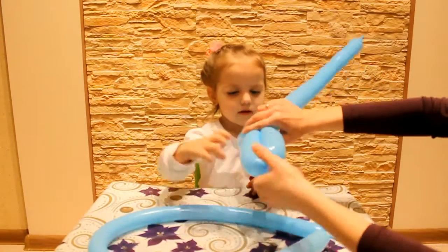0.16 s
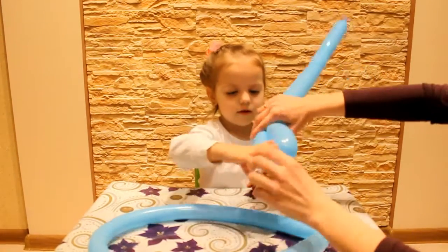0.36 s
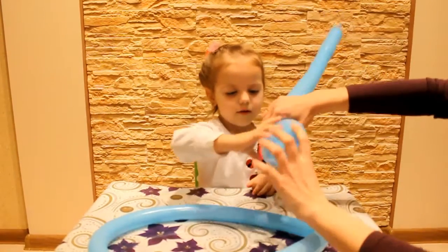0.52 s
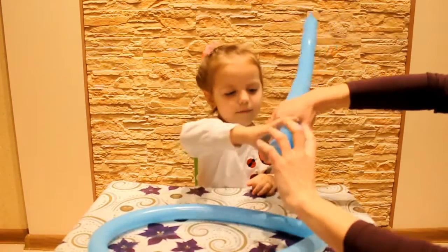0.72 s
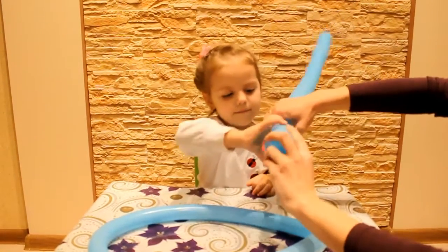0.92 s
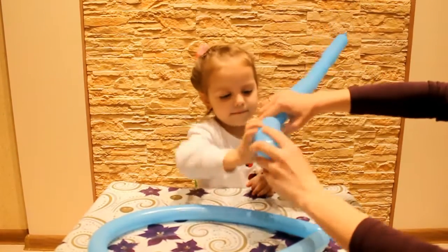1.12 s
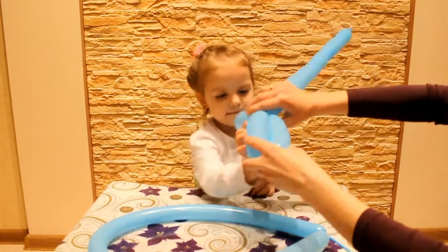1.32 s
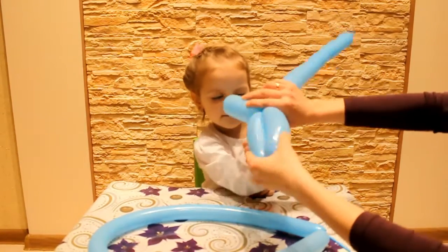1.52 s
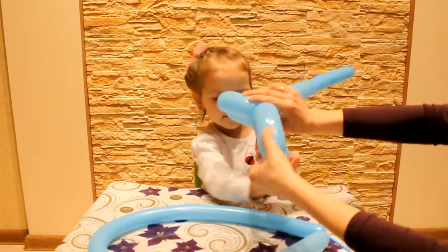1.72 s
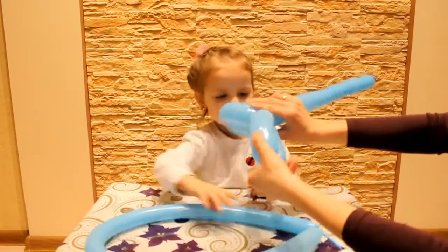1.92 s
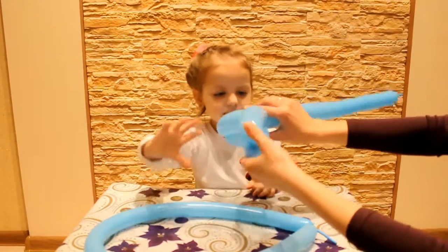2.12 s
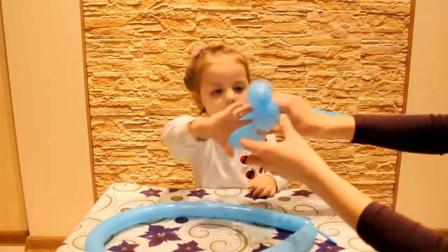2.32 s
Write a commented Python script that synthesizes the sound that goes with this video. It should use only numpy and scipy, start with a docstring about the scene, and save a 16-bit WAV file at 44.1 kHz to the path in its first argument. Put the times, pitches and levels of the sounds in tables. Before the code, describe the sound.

A latex balloon is twisted by hand, starting with sharp rubbery snaps, fine rubbing and soft bumps. A faint squeak rises at 0.4 seconds. After a lull around 1 second, snaps crowd into a loud, fast chattering creak at 1.45 seconds. More snaps follow and thin out, with two strong ones near 2 seconds. Each leaves a short echo in the bare room, heard from a distance.

```python
"""A bare, echoing room; one microphone, far enough off to hear as much room as balloon.
Hands twist a long latex balloon: the rubber sticks and slips in single snaps, with fine rubbing between
them and a few soft bumps. A faint squeak rises at 0.37 s. After a lull around 1 s the snaps crowd together,
and at 1.45 s they run into one fast chattering creak. More snaps follow and thin out.
Each slip is a few milliseconds long; the room draws it out into a tail."""
import sys
import numpy as np
from scipy import signal
from scipy.fft import rfft, irfft
from scipy.io import wavfile
from scipy.ndimage import uniform_filter1d

SR = 44100
rng = np.random.default_rng(int(sys.argv[2]) if len(sys.argv) > 2 else 0)


def master_out(mix):
    """Clip the mix to full scale and print it as 16-bit PCM to the path in sys.argv[1]."""
    frames = np.transpose(np.atleast_2d(mix))
    ceiling = np.clip(frames, -1, 1)
    pcm = np.round(ceiling * 32767).astype(np.int16)
    wavfile.write(sys.argv[1], SR, pcm)


N = 103811

# Room tone. Each row: frequency in Hz, relative level in dB.
ROOM_TONE_COLOUR = [(25, -51), (100, 1), (300, 11.5), (600, 4), (1500, 10.5), (4000, 2.5), (8000, -7),
                    (16000, -33)]
# Echoes off table and walls. Each row: delay in seconds, level in dB.
EARLY_ECHOES = [(.0035, -11.5), (.0092, -6.5), (0.0148, -16)]
# The room's tail. Each row: frequency in Hz, seconds to fall by 60 dB.
ROOM_DECAY = [(150, 0.7), (500, 0.52), (1400, 0.53), (3700, 0.42), (8000, 0.33), (14000, 0.27)]
# Hands bumping the balloon. Each row: start in seconds, level in dB, pitch in Hz.
HAND_BUMPS = [(0.137, -37, 186), (0.518, -44, 131), (0.6, -37, 148), (1.96, -36, 226), (2.087, -36, 217),
              (2.16, -36, 215)]
# How skin and microphone colour a slip. Each row: frequency in Hz, gain in dB.
SKIN_COLOUR = [(35, -67), (60, -76), (103, -54.5), (212, -23.5), (515, 4.5), (924, -7), (1550, -6),
               (1820, -5.5), (3270, -9.5), (4030, -12.5), (10800, -26.5), (14200, -48.5), (16000, -104)]
# The balloon's resonances. Each row: centre in Hz, width in Hz, gain in dB.
RESONANCES = [(552, 78, -10), (580, 300, -0.5), (1005, 254, 3.5), (1538, 46, 3), (2280, 540, 1),
              (3055, 110, -2.5), (4870, 740, 0.5)]
# Course of the rubbing. Each row: time in seconds, relative level in dB, tilt in dB per octave.
RUB_COURSE = [(0, -18.5, -3.5), (.04, -55, 16.5), (0.124, -25, -2), (.2, -26, -1), (.3, -63, -2),
              (.38, -37, 0), (.5, -33, 0), (0.589, -37, -3), (.62, -31, 0.5), (0.701, -27, 1.5),
              (.73, -26, 0), (.77, -27.5, 3), (.8, -29, 4.5), (.87, -34, 1), (.95, -33, 1.1),
              (.97, -48, -1), (1.1, -40, -0.5), (1.3, -45.5, -0.5), (1.4, -35.5, 6), (1.46, -12, -2),
              (1.52, -13, 0), (1.6, -18, 3.5), (1.72, -23.5, 1.7), (1.8, -25.5, 1), (1.88, -33.5, 1.5),
              (1.95, -29, 2), (2.05, -31.5, 1.7), (2.12, -23.5, -0.8), (2.17, -27, 0.5), (2.35, -42, -2)]
# Bright band of the taut skin in the creak. Each row: frequency in Hz, gain in dB.
TAUT_BAND = [(3800, 2.6), (5200, 7.5), (7700, 4.5), (9000, 3)]
# Single slips. Each row: start in seconds, level in dB, flutter in Hz, tilt in dB per octave,
# decay scale in ms (0.8 at least is used), ring of the stretched patch in Hz, its gain in dB.
SNAPS = [(0.0514, -6, 930, 2, 1.16, 4250, 3.5), (0.1288, -17, 2110, -2.5, 1.7, 2080, -9),
         (0.1341, -12.5, 920, 4, 1.87, 1026, 9.5), (0.3265, -34.5, 2650, -3, 3.7, 2650, -10),
         (0.3417, -26, 650, 1.9, 2.3, 3400, 3), (0.4318, -21, 967, 2.5, 1.65, 2750, 2.5),
         (0.4955, -28, 2010, -3.5, 1.3, 420, 10), (.5525, -24, 1285, 13.5, 1.4, 2640, 11),
         (0.5942, -25, 700, 0, 2, 700, -5), (0.604, -19.5, 635, -1.5, 1.6, 420, 6),
         (0.647, -28.5, 582, 5.5, 1.6, 528, 23), (.6732, -27.5, 474, -0.5, 2.6, 524, 2),
         (.7176, -26, 573, 2, 11, 2220, -9), (0.7316, -15, 1210, 2.6, 0.51, 1290, 3.5),
         (0.987, -33.5, 673, 7, 1.9, 5000, -2), (1.1254, -30.5, 2900, 4.5, 1.7, 4500, -14),
         (1.1348, -12, 1730, -2, 1.08, 573, 7), (1.3364, -21.5, 3130, 0.5, 0.47, 2980, 2),
         (1.353, -26.5, 2540, 1.5, 2.5, 2720, -8), (1.393, -25, 837, -6.5, 3.2, 1610, 13),
         (1.4071, -15.5, 676, -4, 1.04, 2400, 13), (1.4123, -18, 1614, 5.5, 1.2, 3200, 9),
         (1.44, -3.5, 794, 2, 1.8, 2270, 6.5), (1.446, -41, 1550, 15, 3.1, 1530, 19),
         (1.5715, -17.5, 583, -1, 1.1, 542, 8), (1.5935, -7, 1780, 3.5, 1.4, 2630, 7),
         (1.608, -8.5, 1573, 4, 1.9, 6500, 7.5), (1.6285, -11, 1576, -2, 2.1, 1820, -3),
         (1.678, -12.5, 669, 4.5, 1.9, 1900, 9), (1.694, -9.5, 1355, 4.5, 0.75, 1280, 11),
         (1.706, -17, 1630, 5.5, 1.2, 2150, -2), (1.734, -21.5, 1380, 2, 1.8, 2820, 6),
         (1.9605, -5, 734, -0.5, 0.64, 2340, 3.5), (2.04, -25.5, 1426, 2.5, 2.4, 2280, -5),
         (2.081, -22.5, 500, 2.5, 2.9, 493, 2.5), (2.1543, -4, 1256, -2, 1.82, 4100, 5),
         (2.339, -21.5, 558, 0, 4.2, 630, 3.5)]

HZ = np.fft.rfftfreq(4096, 1 / SR)  # the grid for filter curves
OCTAVES = np.log2(np.maximum(HZ, 200) / 1500)  # tilts pivot on 1500 Hz


def amp(db):
    return 10 ** (np.asarray(db) / 20)


def unit_rms(x):
    return x / np.sqrt(np.mean(x ** 2) + 1e-20)


def curve_at(points, hz):
    f, value = np.transpose(points)
    return np.interp(np.log(hz + 1), np.log(f + 1), value)


def add(mix, start_s, sound):
    part = mix[round(start_s * SR):][:len(sound)]
    part += sound[:len(part)]


def coloured(x, db):
    """x through the shortest-delay filter for a dB curve on the HZ grid, tail included."""
    log_gain = np.log(amp(np.maximum(np.r_[db, db[-2:0:-1]], -100)))
    response = np.fft.ifft(np.exp(np.conj(signal.hilbert(log_gain)))).real[:2048]
    return signal.fftconvolve(x, response)


def room_tone(level_db=-48):
    """The steady noise of the room at the microphone."""
    colour = amp(curve_at(ROOM_TONE_COLOUR, np.fft.rfftfreq(N, 1 / SR)))
    return amp(level_db) * unit_rms(irfft(rfft(rng.standard_normal(N)) * colour, N))


def room_echo(direct, tail_db=1.5):
    """The room answers duller: early echoes, then three crossfading tails dying band by band."""
    duller = coloured(direct, -1.5 * np.maximum(OCTAVES, 0))[:N]
    early, tails = np.zeros(2000), np.zeros(N)
    for delay_s, db in EARLY_ECHOES:
        add(early, delay_s, amp([db]))
    for k in range(3):
        taps, slots = np.zeros(SR), np.arange(200, SR - 20, 10)
        taps[slots + rng.integers(0, 10, len(slots))] = rng.choice([-1., 1.], len(slots))
        hz, t, bands = signal.stft(taps, SR, nperseg=256)
        decay_db = -60 * t / curve_at(ROOM_DECAY, hz)[:, None]
        onset_db = 1.5 * np.exp(-t / 0.017)  # extra energy early in the tail
        tail = signal.istft(bands * amp(decay_db + onset_db), SR, nperseg=256)[1]
        crossfade = np.sqrt(2 / 3) * np.cos(np.pi * (9 * np.arange(N) / SR + k / 3))
        tails += signal.fftconvolve(duller * crossfade, tail / np.linalg.norm(tail))[:N]
    return signal.fftconvolve(duller, early)[:N] + amp(tail_db) * tails


def hand_bumps(t60_s=0.045, attack_s=0.0019):
    """Each push of a hand gives a low, damped tone."""
    out, t = np.zeros(N), np.arange(8000) / SR
    for start_s, db, hz in HAND_BUMPS:
        envelope = amp(db - 60 * t / t60_s) * np.minimum(t / attack_s, 1)
        add(out, start_s, envelope * np.sin(2 * np.pi * hz * t))
    return out


def squeak(start_s=.37, length_s=.08, level_db=-47.5, from_hz=2600, to_hz=4700, width_hz=900):
    """A narrow band of noise glides upward as the skin tightens."""
    out, progress = np.zeros(N), np.linspace(0, 1, round(length_s * SR))
    noise = rng.standard_normal((2, 6000))
    fuzz = signal.lfilter(*signal.butter(2, width_hz / 2, fs=SR), noise)[:, :len(progress)]
    phase = 2 * np.pi * np.cumsum(from_hz + (to_hz - from_hz) * progress) / SR
    band = unit_rms(fuzz[0] * np.cos(phase) + fuzz[1] * np.sin(phase))
    add(out, start_s, amp(level_db) * np.sqrt(np.sin(np.pi * progress) + 1e-9) * band)
    return out


def skin_db():
    """The skin's broad colour with the balloon's resonances on top."""
    peaks = sum(db / (1 + (2 * (HZ - hz) / width) ** 2) for hz, width, db in RESONANCES)
    return curve_at(SKIN_COLOUR, HZ) + peaks


def rubbing(slips_per_s=1000, spread_db=3, trim_db=-9):
    """Dense random micro-slips, blended between a dull and a bright skin colour."""
    times, db, tilt_db = np.transpose(RUB_COURSE)
    t = np.arange(N) / SR
    size, chance, side = rng.random((3, N))
    strength = amp(spread_db * np.minimum(-np.log(size + 1e-9), 4))
    ticks = strength * (chance < slips_per_s / SR) * np.sign(side - .5)
    dull, bright = (unit_rms(coloured(ticks, tilt * OCTAVES + skin_db())[:N]) for tilt in (-4, 4))
    blend = np.clip(.5 + np.interp(t, times, tilt_db) / 8, 0, 1)
    return amp(np.interp(t, times, db) + trim_db) * ((1 - blend) * dull + blend * bright)


def slip(noise, db, flutter_hz, tilt_db, decay_ms, ring_hz, ring_db, taut_db=0, crossover_hz=4500):
    """Rubber lets go of rubber: tiny ticks below and a crack of noise above swell and die together."""
    t = np.arange(len(noise)) / SR
    tick_s = (np.arange(24) + .07 * noise[-24:]) / flutter_hz  # slightly uneven
    ticks = np.sinc((t[:, None] - tick_s) * SR - 8).sum(1) * np.sqrt(SR / flutter_hz)
    ticks = signal.lfilter(*signal.butter(2, crossover_hz, fs=SR), ticks)
    crack = signal.lfilter(*signal.butter(2, crossover_hz, "high", fs=SR), noise)
    age = t * 1000 / max(decay_ms, .8)
    burst = .5 * (ticks + crack) * (.2 + age) * np.exp(-1.7 * age)
    patch_db = ring_db / (1 + (2 * (HZ - ring_hz) / (.3 * ring_hz)) ** 2)
    # Halving the spectral lumps above 5500 Hz keeps the treble even and unpitched.
    burst_db = uniform_filter1d(20 * np.log10(abs(rfft(burst, 4096)) + 1e-6), 15)
    lumps_db = (burst_db - uniform_filter1d(burst_db, 300)) / (1 + (5500 / (HZ + 1)) ** 8)
    snap = coloured(burst, tilt_db * OCTAVES + patch_db + taut_db - .5 * lumps_db + skin_db())[:2048]
    peak_power = uniform_filter1d(snap ** 2, 66).max()  # the loudest 1.5 ms
    return amp(db) * snap / np.sqrt(4 * peak_power)


def creak(noises, start_s=1.4538, count=18, first_gap_s=.0067, shrink_s=.0005, least_gap_s=.0036):
    """Slips of the taut skin follow each other faster, settle into a chatter and fade."""
    out, k = np.zeros(N), np.arange(count)
    gaps = np.maximum(first_gap_s - shrink_s * k, least_gap_s)
    starts = start_s + np.cumsum(gaps) - gaps
    for at_s, progress, noise in zip(starts, k / count, noises):
        db = -3 - 19 * progress ** 3 + noise[0]  # 1 dB of scatter
        flutter_hz = 696 * (1 + 0.23 * np.tanh(noise[1]))
        add(out, at_s, slip(noise, db, flutter_hz, tilt_db=3, decay_ms=1.28,
                            ring_hz=523, ring_db=8.5, taut_db=curve_at(TAUT_BAND, HZ)))
    return out


def snaps(noises):
    """The twisted rubber sticks, then gives way one slip at a time."""
    out = np.zeros(N)
    for (start_s, *settings), noise in zip(SNAPS, noises):
        add(out, start_s, slip(noise, *settings))
    return out


def scene():
    """What reaches the microphone: the balloon, its echo and the room tone."""
    noises = rng.standard_normal((80, 400))  # each slip takes a row of its own
    balloon = snaps(noises) + creak(noises[::-1]) + rubbing() + squeak() + hand_bumps()
    return (balloon + room_echo(balloon) + room_tone())[None]


def record(dry, knee=.65, ceiling=.92, low_hz=45, top_hz=15900):
    """Microphone and recorder: peaks above the knee are squeezed; bass roll-off, then the band limit."""
    over, headroom = np.maximum(abs(dry) - knee, 0), ceiling - knee
    squeezed = dry - np.sign(dry) * (over - headroom * np.tanh(over / headroom))
    thinned = signal.lfilter(*signal.butter(1, low_hz, "high", fs=SR), squeezed)
    band_limit = signal.firwin(511, top_hz, window=("kaiser", 9), fs=SR)
    return signal.oaconvolve(thinned, band_limit[None], "same")


dry = scene()
out = record(dry)
master_out(out)
```